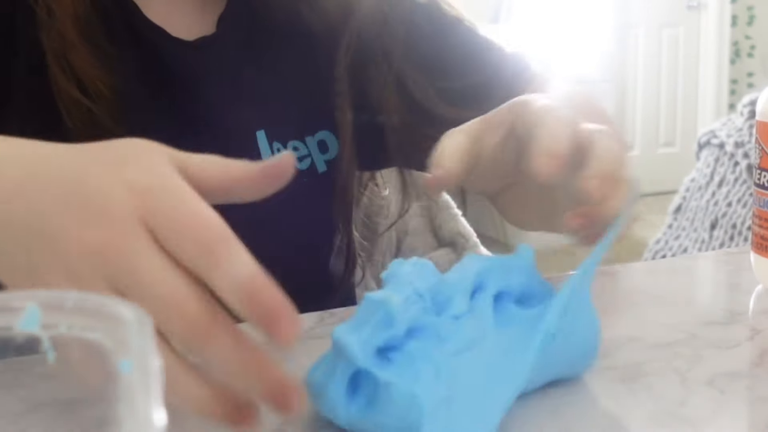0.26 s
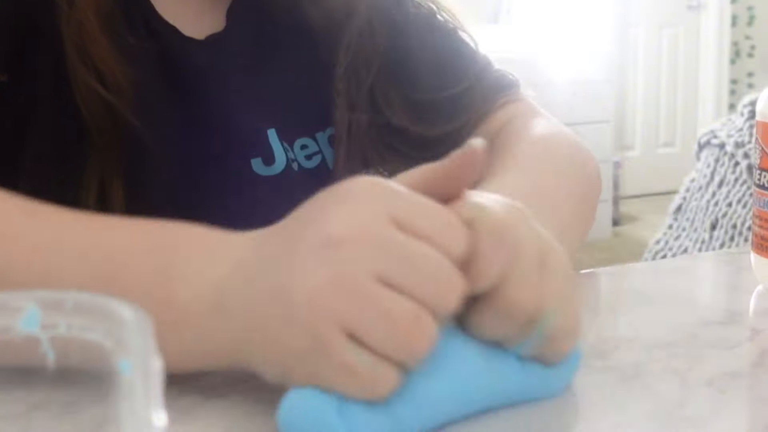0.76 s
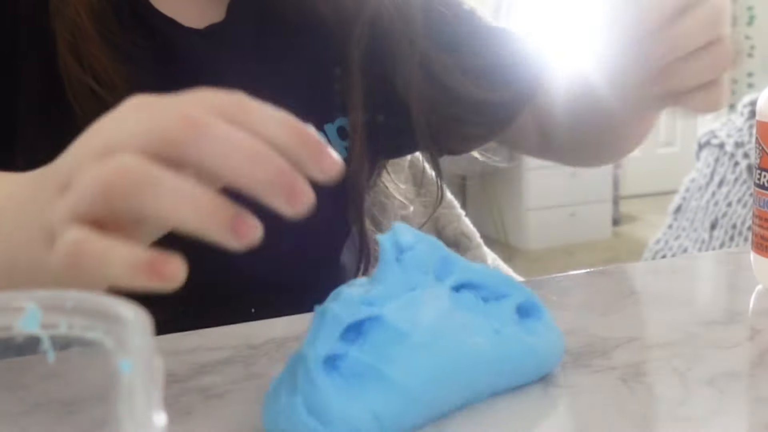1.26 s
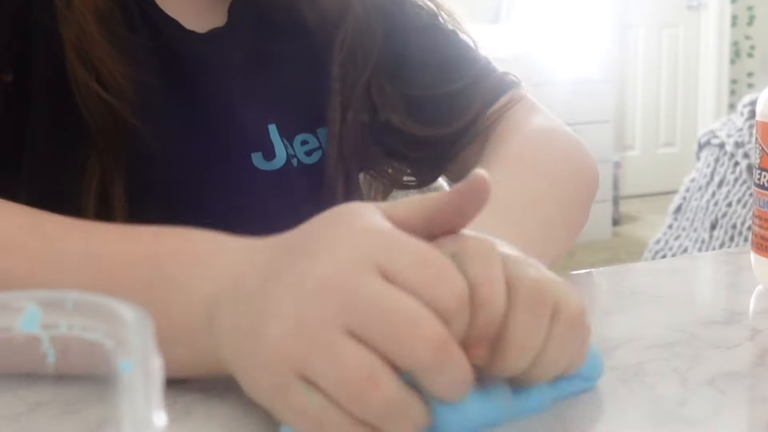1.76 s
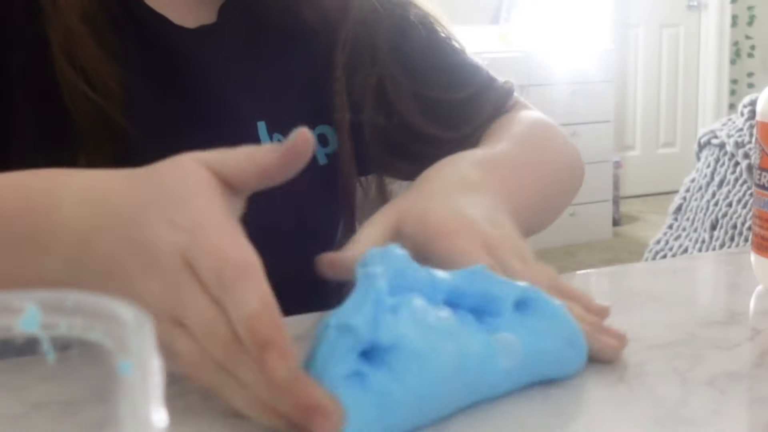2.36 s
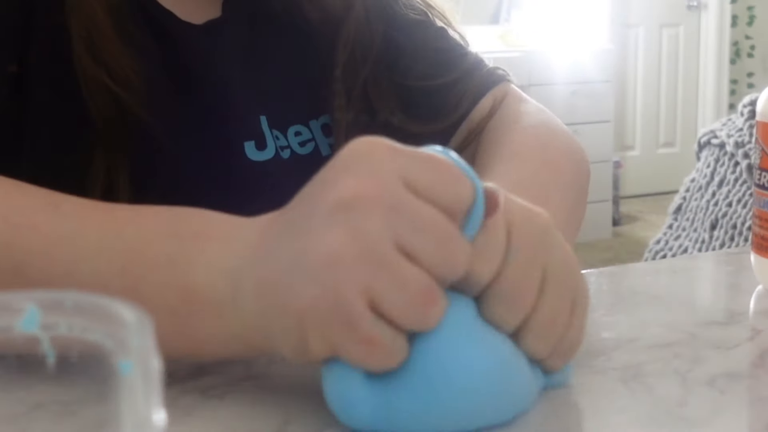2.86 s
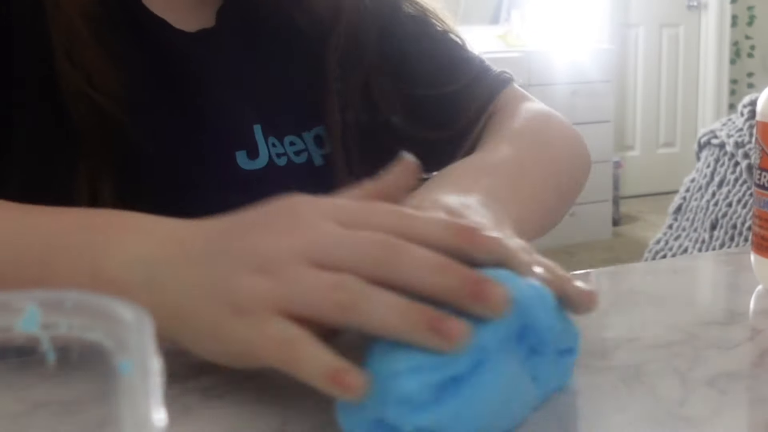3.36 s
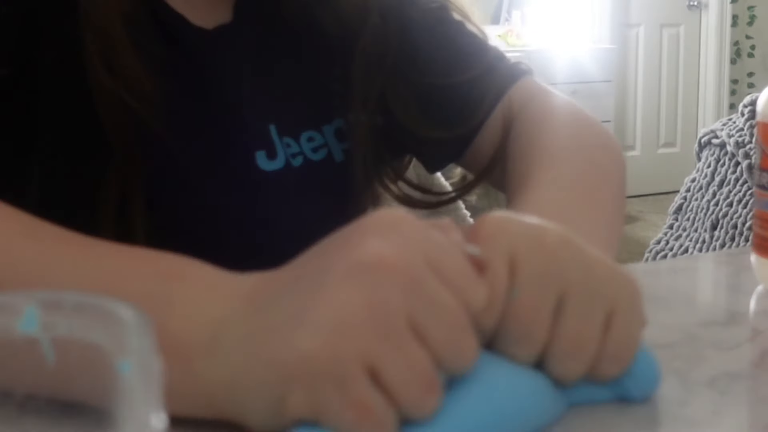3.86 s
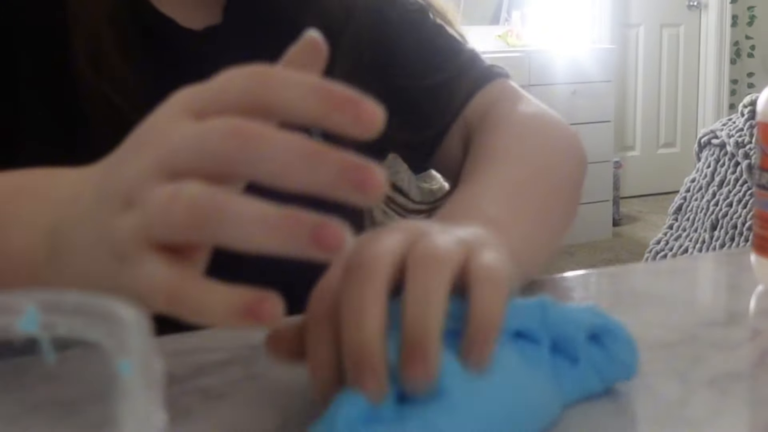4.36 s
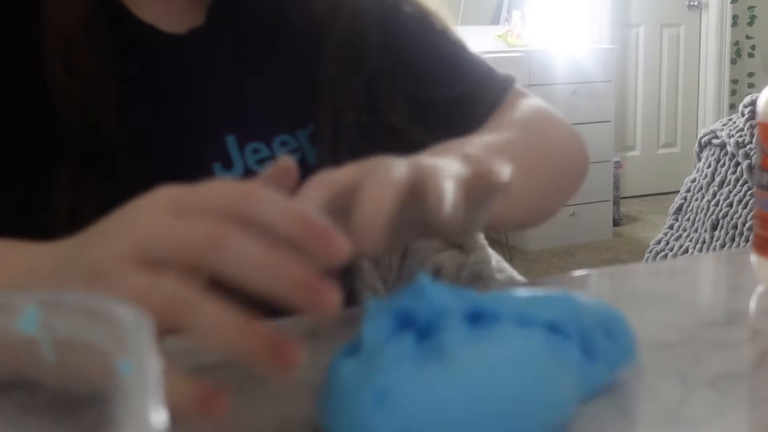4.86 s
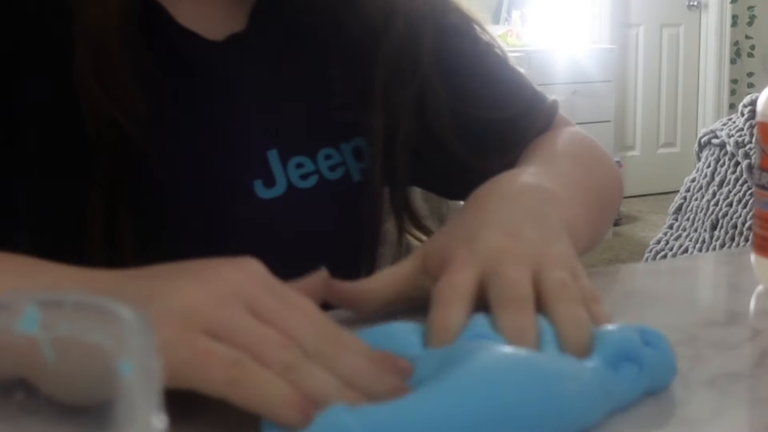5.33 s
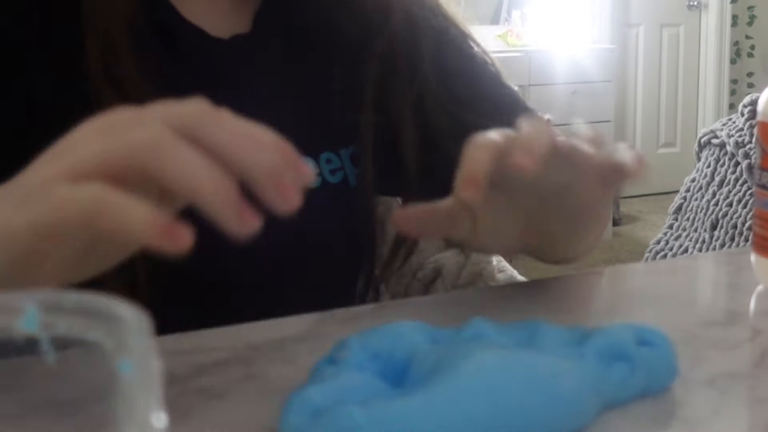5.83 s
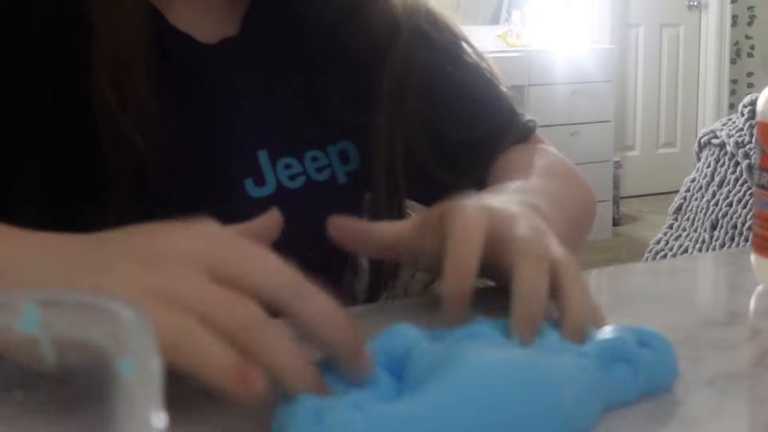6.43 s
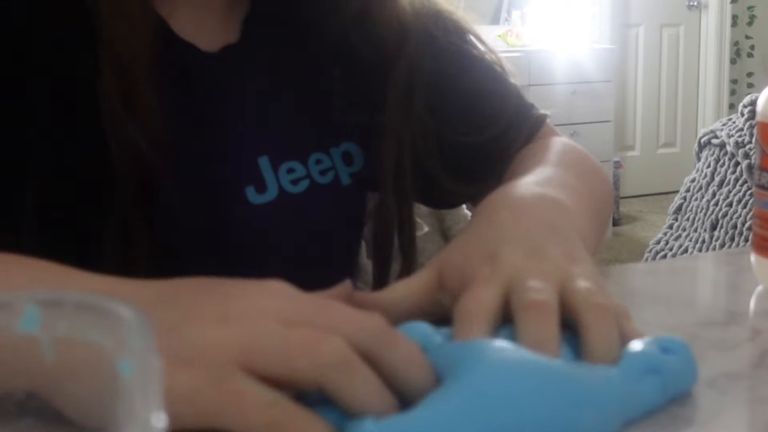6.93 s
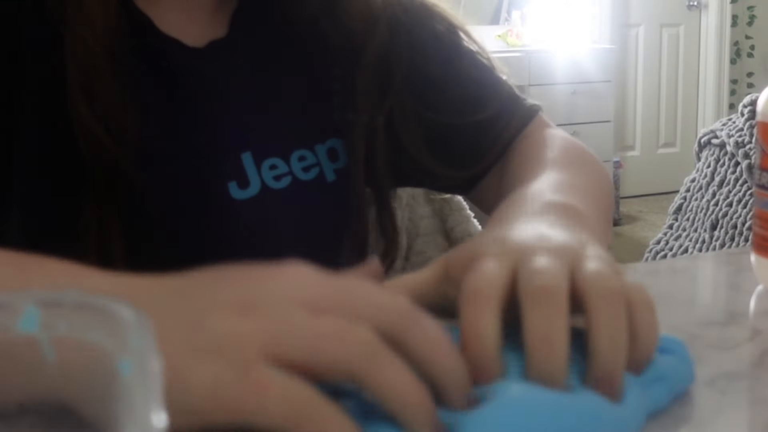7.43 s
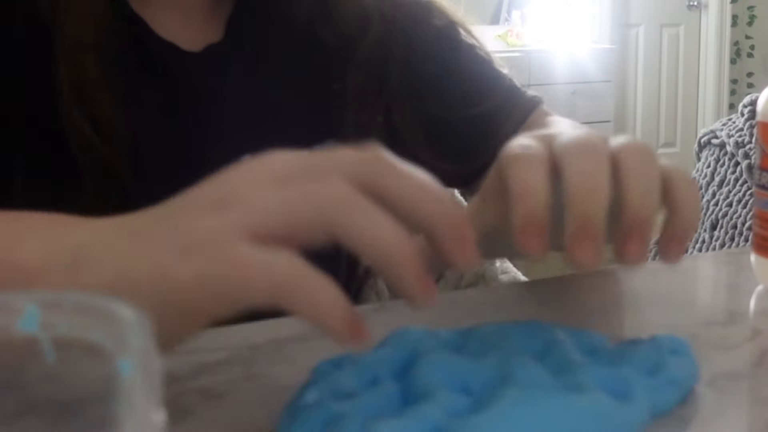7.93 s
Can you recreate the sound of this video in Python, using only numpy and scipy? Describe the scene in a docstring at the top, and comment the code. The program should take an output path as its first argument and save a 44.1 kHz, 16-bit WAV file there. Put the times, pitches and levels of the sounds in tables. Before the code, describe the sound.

Two hands knead a lump of slime on a stone table in a small room. Each squeeze sets off a cluster of sharp pops and fine crackling, about once a second, with soft thuds and a faint crackle as the hands peel away. After a quieter stretch, fingers poke the slime, making shorter, softer bursts of pops. The microphones are close, over a faint steady hiss.

```python
"""Air pockets pop one by one in a lump of slime as two hands knead it, then poke it, on a stone table.
Each pop is a thin film tearing and making the air behind it ring. Swarms of tiny bubbles crackle
under each squeeze and as the hands peel off, and the lump lands with soft thuds.
A close pair of microphones hears it all in a small room, over a faint hiss."""
import sys
import numpy as np
from scipy import signal
from scipy.fft import rfft, irfft
from scipy.io import wavfile

SR = 44100
rng = np.random.default_rng(int(sys.argv[2]) if len(sys.argv) > 2 else 0)


def store_pcm(level_fs):
    """Save levels as 16-bit WAV."""
    pcm = np.round(np.clip(level_fs, -1, 1) * 32767).astype(np.int16)
    wavfile.write(sys.argv[1], SR, np.atleast_2d(pcm).T)


N = 361179

# the hands peel off the slime: (start [s], length [s], level [dB])
PEELS = [(1.032, 0.18, -45), (2.094, .12, -39.5), (3.07, .125, -39.5), (4.037, .155, -43),
         (4.509, .06, -48), (4.8, 0.14, -45.5)]


def from_db(db):
    """Turn decibels into a number to multiply a sound by."""
    return 10 ** (np.asarray(db) / 20)


def unit_energy(x):
    """Scale a sound so that its channels have an average energy of 1."""
    return x / np.sqrt(np.sum(x ** 2, axis=-1).mean() + 1e-20)


def at_hz(points, hz):
    """Read between the rows of a (pitch [Hz], value) table, giving each octave equal room."""
    pitches, values = np.transpose(points)
    return np.interp(np.log(hz), np.log(pitches), values)


def add(out, s, sound):
    """Mix a sound in, starting at s seconds."""
    start = int(np.clip(round(s * SR), 0, N - 1))
    out[..., start:start + sound.shape[-1]] += sound[..., :N - start]


def butter(x, hz, kind, order=2):
    """Keep the "low" part of a sound, the "high" part, or a "band" between two pitches."""
    return signal.sosfilt(signal.butter(order, np.clip(hz, 10, .45 * SR), kind, fs=SR, output="sos"), x)


def diffuse(white, hz):
    """Blend two noises into left and right, as alike as sound from all round is at this pitch."""
    # how alike left and right are: (pitch [Hz], likeness [1 = the same])
    likeness = [(50, 0.98), (150, 0.89), (500, 0.85), (2000, 0.94), (5000, 0.9), (9000, 0.97), (15000, 1)]
    alike = np.clip(at_hz(likeness, hz), 0, 1)
    return np.sqrt((1 + alike) / 2) * white[0] + np.sqrt((1 - alike) / 2) * white[1] * [[1], [-1]]


def noise_bands(size):
    """Noise from all round, in narrow bands: (middle pitch [Hz], band)."""
    edges = np.geomspace(30, 18000, 25)
    white = rng.standard_normal((2, 2, size))
    for k, (low, high) in enumerate(zip(edges, edges[1:])):
        hz = np.sqrt(low * high)
        yield hz, diffuse(butter(white[k % 2], [low, high], "band"), hz)


def background(hiss_db=-57, gain_db=-1.0, widen_db=5.0):
    """Steady hiss and rumble with a few faint whines, coming from all round."""
    # tone of the hiss and rumble: (pitch [Hz], relative level [dB])
    hiss_tone = [(30, -21), (60, -13), (110, -0.5), (230, -2), (400, -5), (750, -7), (1150, -11.5),
                 (1900, -3.5), (2500, -8), (3000, -19), (4200, -14), (5500, -18), (8000, -22.5),
                 (16000, -25.5)]
    # narrow humps and whines in the hiss: (pitch [Hz], width [Hz], level [dB])
    humps = [(1671, 18, -75.5), (2270, 430, -64.5), (2630, 52, -67.5), (3460, 60, -75), (3850, 90, -72.5),
             (4467, 145, -71.5), (4900, 280, -78.5)]
    hiss = sum(band * from_db(at_hz(hiss_tone, hz)) for hz, band in noise_bands(N))
    out = from_db(hiss_db + gain_db) * unit_energy(hiss)
    for hz, width_hz, db in humps:
        hump = butter(rng.standard_normal((2, N)), [hz - width_hz / 2, hz + width_hz / 2], "band")
        out += from_db(db) * unit_energy(diffuse(hump, hz))
    middle = out.mean(axis=0)
    return (middle + from_db(widen_db) * (out - middle)) * np.sqrt(N)


def room(x, echo_db=-10.0, first_wall_s=0.011, build_s=0.021):
    """Wall echoes build up, then die away, the treble first; a few notes of the room ring too."""
    # tone of the echoes: (pitch [Hz], relative level [dB])
    tone = [(100, -2.5), (220, 5), (350, 2), (600, -2), (1200, -8), (2500, -5), (5000, -2), (9000, -5.5),
            (16000, 1)]
    # how long the echoes last: (pitch [Hz], time to fade by 60 dB [s])
    fades = [(100, 0.63), (300, 0.4), (700, 0.42), (2000, 0.35), (5000, 0.29), (16000, 0.28)]
    # standing waves, the notes held between the walls: (pitch [Hz], level [dB], time to fade 60 dB [s])
    standing_waves = [(230.5, -59.5, 0.98), (533.3, -44, 0.23), (618, -48, 0.12)]
    t = np.arange(SR // 2) / SR
    build = np.clip(t / build_s, 0, 1)
    tail = sum(band * from_db(at_hz(tone, hz) - 60 * t / at_hz(fades, hz))
               for hz, band in noise_bands(len(t)))
    tail = from_db(echo_db) * unit_energy(tail * build * (t > first_wall_s))
    for hz, db, fade_s in standing_waves:
        tail += from_db(db - 60 * t / fade_s) * np.sin(2 * np.pi * hz * t) * build
    return signal.fftconvolve(x.mean(axis=0)[None], tail, axes=1)[:, :N]


def landings(sag_after_s=0.036, sag_db=-7.5, lump_hz=189, spread_octaves=0.17):
    """The lump is struck, or sags back after a peel: (time [s], level [dB], pitch [Hz])."""
    # soft landings of hands and slime: (time [s], level [dB])
    blows = [(.005, -47), (.075, -44), (.352, -54), (.713, -49), (0.892, -39.5), (.94, -48), (1.62, -55.5),
             (1.899, -49), (1.972, -39.5), (2.361, -50), (2.703, -45.5), (2.801, -49.5), (5.433, -51.5),
             (5.765, -41.5), (5.822, -42), (6.503, -38.5), (6.791, -51.5), (7.161, -41), (7.805, -43.5),
             (7.863, -38), (8.111, -51), (8.18, -51.5)]
    sags = [(s + sag_after_s, db + sag_db) for s, _, db in PEELS]
    # the pitch varies a little with the lump's shape
    return [(s, db, lump_hz * 2 ** (spread_octaves * rng.normal())) for s, db in blows + sags]


def thuds(rise_s=0.00641, ring_s=0.0098, rub_share=0.62, rub_width=2.09, gain_db=-0.5):
    """The soft lump takes the blow and wobbles a few times, with a dull rub of skin."""
    out, t = np.zeros(N), np.arange(SR // 8) / SR
    press = (1 - np.exp(-t / rise_s)) * np.exp(-t / ring_s)
    for s, db, hz in landings():
        wobble = unit_energy(press * np.sin(2 * np.pi * (hz * t + rng.random())))
        rub = butter(rng.standard_normal(len(t)) * press, [hz / rub_width, hz * rub_width], "band")
        blow = np.sqrt(1 - rub_share) * wobble + np.sqrt(rub_share) * unit_energy(rub)
        add(out, s - rise_s, blow * np.sqrt(.02 * SR) * from_db(db + gain_db))
    return out


def cavity(x, hz, q):
    """Trapped air rings, longer with a higher q; so small a pocket gives out little below its pitch."""
    turn = 2 * np.pi * min(hz, .4 * SR) / SR
    decay = np.exp(-turn / 2 / max(q, .3))
    ring = signal.lfilter([1, -1], [1, -2 * decay * np.cos(turn), decay * decay], x + 1e-18)
    return butter(ring, hz / 7, "high")


def tear_at(s):
    """The tone of a tearing film at s seconds: mostly duller under palms, brighter among open fingers."""
    # tone of the tears: (time [s], brightness [Hz], scattered sound against the snap [dB])
    tears = [(0, 9000, -4), (.75, 5200, -2), (1.95, 8000, -4), (2.75, 7000, -4), (2.88, 14800, -4.5),
             (3.75, 9800, -4), (4.8, 9400, 0), (5.8, 16000, -3), (7.8, 13000, 1)]
    times, hz, scatter_db = np.transpose(tears)
    return np.interp(s, times, hz), np.interp(s, times, scatter_db)


def grip(t, slips_per_s=91, wander_db=4):
    """Skin sticks and slips, so the loudness wanders in uneven spurts."""
    slips = rng.standard_normal(size=64)
    return from_db(wander_db * np.interp(t * slips_per_s, np.arange(len(slips)), slips))


def swarms():
    """Every squeeze and every peel sets off a swarm of bubbles."""
    # palms or fingers press in: (start [s], length [s], level [dB], middle bubble pitch [Hz])
    squeezes = [(0, 0.097, -37.5, 2050), (.578, 0.046, -53.5, 4000), (0.851, 0.098, -37, 2920),
                (1.924, 0.069, -26.5, 4750), (2.8, 0.065, -35, 3300), (2.868, 0.05, -54, 5370),
                (3.711, 0.1, -38.5, 4020), (3.83, 0.11, -39.5, 2500), (5.748, 0.065, -46.5, 2340),
                (6.498, 0.024, -32, 2700), (7.135, .037, -33.5, 3260), (7.81, 0.041, -40.5, 3020)]
    # (start [s], length [s], swell [s], level [dB], pitch [Hz], bubbles [per s], muffled above [Hz])
    pressed = [(s, length, 0.002, db, hz, 2200, 0.77 * tear_at(s)[0]) for s, length, db, hz in squeezes]
    peeled = [(s, length, 0.0053, db, 2250, 2400, 13000) for s, length, db in PEELS]
    return pressed + peeled


def crackles(size_db=1.5, q=1.47, ease_share=0.18, scatter_s=0.0018, scatter_db=-16, gain_db=-0.44):
    """Tiny bubbles of many sizes burst at random under the hand; each rings for a cycle or two."""
    out, t = np.zeros((2, N)), np.arange(SR // 4) / SR
    echo_t = np.arange(SR // 100) / SR
    echo_fade = from_db(scatter_db) * np.exp(-echo_t / scatter_s)
    octaves = np.linspace(-2, 2, 9)
    for s, length, swell_s, db, hz, per_s, muffle_hz in swarms():
        ease_off = (length - t) / (ease_share * length)
        press = np.clip(np.minimum(t / swell_s, ease_off), 0, 1) * grip(t)
        swarm = 0
        for octave in octaves:
            bursts = rng.random(len(t)) < per_s / SR / len(octaves)
            sizes = from_db(size_db * np.minimum(rng.exponential(1, len(t)), 3))
            kicks = bursts * sizes * press * rng.choice([-1, 1], len(t))
            pitch = hz * 2 ** octave
            paths = (echo_t == 0) + echo_fade * diffuse(rng.standard_normal((2, len(echo_t))), pitch)
            bubble = unit_energy(cavity(paths, pitch, q))
            bubble *= np.exp(-(octave / 3.5) ** 2)   # middle sizes are loudest
            swarm = swarm + signal.fftconvolve(kicks[None], bubble, axes=1)
        swarm = butter(swarm, muffle_hz, "low", order=1)   # the slime around them swallows the treble
        add(out, s, unit_energy(swarm) * np.sqrt(length * SR) * from_db(db + gain_db))
    return out


def pockets(per_swarm=3, spread_db=5.5, spread_octaves=0.77, q=1.13):
    """List the large air pockets, plus a few smaller ones at random within each swarm."""
    # large air pockets bursting: (time [s], level over 5 ms [dB], pitch [Hz], ringing [q])
    large = [(.0302, -37, 2550, 1.9), (.0837, -33, 1600, 0.31), (.0866, -23, 1240, 1.7),
             (.353, -48, 640, 0.44), (.61, -46.5, 2500, 0.43), (.7119, -24, 1960, .56),
             (.7955, -35.5, 2930, 1.2), (.8209, -34, 1560, 1.8), (.8382, -22, 2790, 2.2),
             (.8588, -26.5, 1930, 0.87), (.876, -13.5, 2670, 1.14), (.8838, -22.5, 3050, 4),
             (1.0673, -31.5, 2270, 0.55), (1.28, -47.5, 610, 2.5), (1.8083, -35.5, 3940, 0.67),
             (1.847, -38.5, 2380, .5), (1.8598, -32, 1860, 2), (1.879, -38, 1760, 1.5),
             (1.8951, -24.5, 850, 0.27), (1.9086, -15, 3570, 1.2), (1.922, -16, 4400, 1.1),
             (1.9271, -9.5, 4300, 2.5), (1.945, -24, 3060, 1.1), (1.9557, -15.5, 5900, 6),
             (1.9904, -17, 1450, 0.57), (2.1237, -30, 770, 0.59), (2.5161, -33, 2900, 0.24),
             (2.5714, -31.5, 1930, 0.63), (2.6959, -20, 2300, 1.34), (2.7742, -32.5, 3160, 0.47),
             (2.796, -32, 3430, 0.46), (2.8019, -21, 1880, 0.63), (2.8279, -19.5, 3500, 0.31),
             (2.8743, -25.5, 2470, 1.4), (2.8887, -16, 4100, 0.14), (2.9118, -21, 2370, 0.6),
             (2.9596, -33, 3260, .6), (3.0898, -37, 880, 0.51), (3.5378, -41.5, 2090, 1.8),
             (3.6909, -31.5, 1950, 0.86), (3.7055, -29, 3550, 2.5), (3.7142, -24, 2770, 0.36),
             (3.7523, -20.5, 5810, 0.89), (3.7606, -21, 4000, 4), (3.7766, -15, 3960, 0.67),
             (3.813, -16.5, 2120, 0.41), (3.8568, -15, 1880, .7), (3.8696, -16, 930, 1.5),
             (3.9406, -36, 4000, 0.26), (4.0475, -33.5, 590, 0.96), (4.1445, -33.5, 616, 4),
             (4.6152, -34.5, 2800, 0.7), (4.6701, -42, 1180, 1.3), (4.83, -37, 1080, 0.5),
             (5.2968, -53.5, 2500, 0.97), (5.4618, -42.5, 2420, 0.45), (5.801, -27.5, 1090, 0.4),
             (5.8234, -22.5, 488, 0.42), (5.8692, -32.5, 730, 3.4), (6.4835, -30.5, 2140, 2.5),
             (6.49, -28.5, 1530, 3.3), (6.4999, -22.5, 3050, 3.5), (6.5131, -26.5, 694, 3.1),
             (7.1358, -25, 5340, 0.57), (7.1579, -22.5, 1380, 0.65), (7.201, -32.5, 970, 0.55),
             (7.2152, -28.5, 720, 2.1), (7.7987, -26, 2280, 1.8), (7.8026, -24.5, 820, 0.83),
             (7.858, -18, 1240, 0.44), (7.8595, -18.5, 2210, 6.1), (7.8792, -26.5, 620, 2.6),
             (7.9716, -27, 660, 8.3), (7.9724, -30.5, 1185, 14)]
    smaller = []
    for s, length, _, db, hz, _, _ in swarms():
        for when, draw in rng.random(size=(per_swarm, 2)):
            size = 2 * draw - 1   # bigger is louder and lower
            pitch = 0.85 * hz / 2 ** (spread_octaves * size)
            smaller.append((s + length * when, db - 1.5 + spread_db * size, pitch, q))
    return large + smaller


def pops(scatter_s=0.0034, table_echo_s=0.014, table_echo_db=-20, lag_samples=0.56, gain_db=0.75):
    """A film tears and kicks the air pocket behind it; hands and table briefly scatter the snap."""
    out, t = np.zeros((2, N)), np.arange(SR // 40) / SR
    kick = 1. * (t == 0)
    table_echo = from_db(table_echo_db) * np.exp(-np.abs(t - table_echo_s) / scatter_s)
    echo_fade = np.exp(-t / scatter_s) + table_echo
    for s, db, hz, q in pockets():
        tear_hz, scatter_db = tear_at(s)
        tear_hz /= max(q, 1) ** 0.26   # a pocket that rings more has a duller tear
        echoes = diffuse(rng.standard_normal((2, len(t))), hz) * echo_fade * (t > .5 / hz)
        snap = unit_energy(butter(cavity(kick, hz, q), tear_hz, "low"))
        scatter = unit_energy(butter(cavity(echoes, hz, q), tear_hz, "low"))
        pop = unit_energy(snap + from_db(scatter_db) * scatter)
        # each pocket lies a little to one side, so the nearer microphone hears it a hair earlier
        lead = lag_samples * rng.normal() * np.array([[.5], [-.5]])
        pop += lead * np.gradient(pop, axis=1)
        add(out, s, pop * from_db(db + gain_db) * np.sqrt(.005 * SR))
    return out


def scene(dip_band_hz=(330.1, 336.6), dip_depth=0.48, low_cut_hz=85):
    """Pops, crackles and thuds close to the microphones, with the room and its hiss behind them."""
    slime = butter(pops() + crackles() + thuds(), low_cut_hz, "high")
    # a narrow band of low pitches is a little hollow at the microphones
    slime -= dip_depth * butter(slime, dip_band_hz, "band", order=1)
    return slime + room(slime) + background()


def record(dry, peak_limit=0.58, rounding_above_hz=250, cutoff_hz=16000):
    """The microphones differ a little in tone; peaks are rounded and the highest treble is cut."""
    # balance of the two microphones: (pitch [Hz], left minus right [dB])
    balance = [(100, -.5), (380, 0), (700, -0.2), (1290, 1.9), (2400, -1), (4400, -1.3), (8100, 0.4),
               (15000, 0.5)]
    tilt_db = at_hz(balance, np.fft.rfftfreq(N, 1 / SR) + 1)
    heard = irfft(rfft(dry) * from_db(tilt_db * np.array([[.5], [-.5]])), N)
    rounding = peak_limit * np.tanh(heard / peak_limit) - heard
    heard += butter(rounding, rounding_above_hz, "high")   # so the rounding adds no bass
    return signal.sosfilt(signal.ellip(10, .1, 70, cutoff_hz, fs=SR, output="sos"), heard)


dry = scene()
out = record(dry)
store_pcm(out)
```